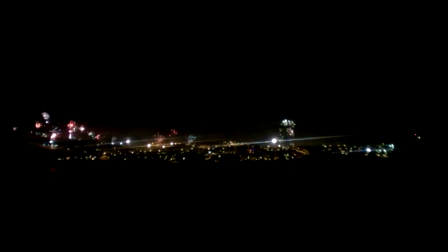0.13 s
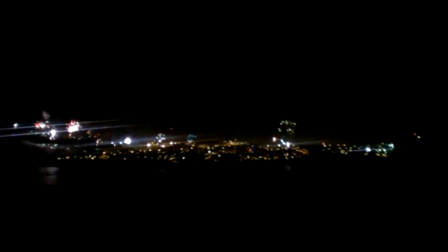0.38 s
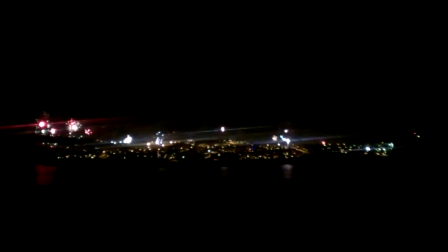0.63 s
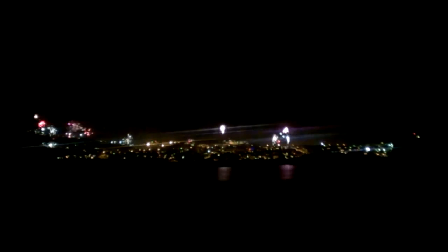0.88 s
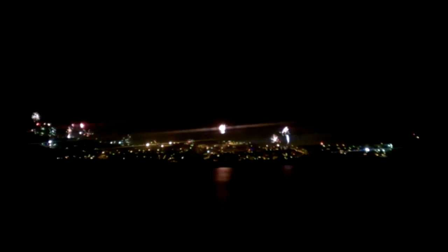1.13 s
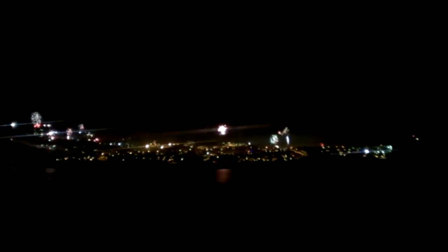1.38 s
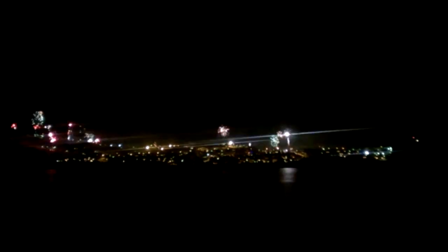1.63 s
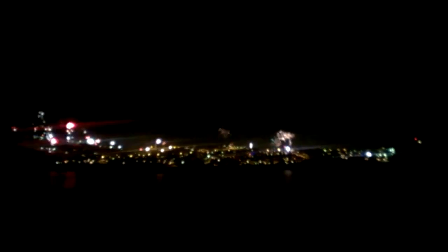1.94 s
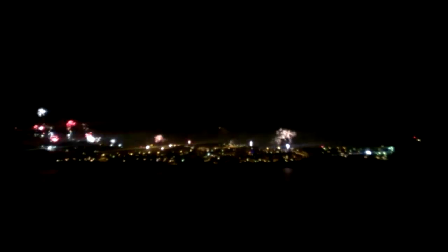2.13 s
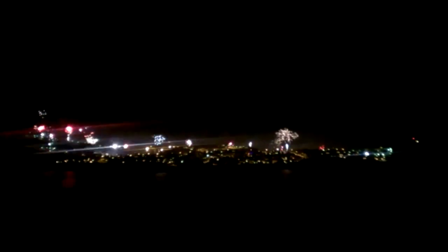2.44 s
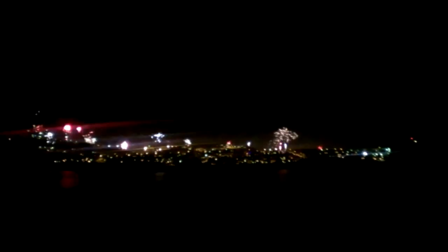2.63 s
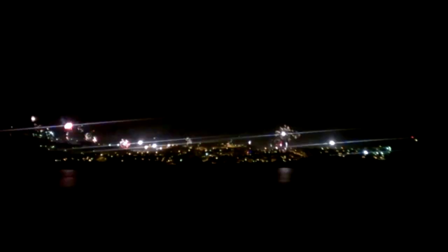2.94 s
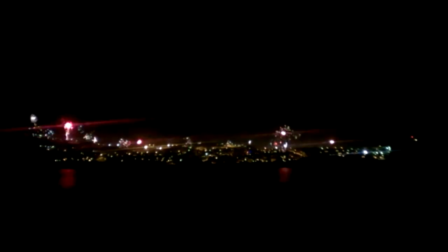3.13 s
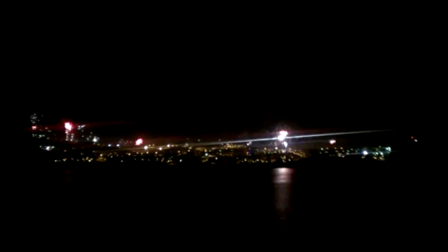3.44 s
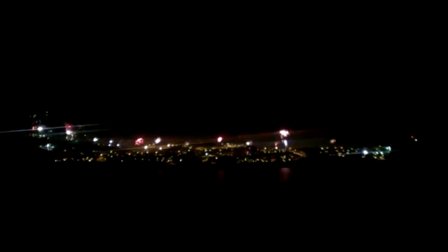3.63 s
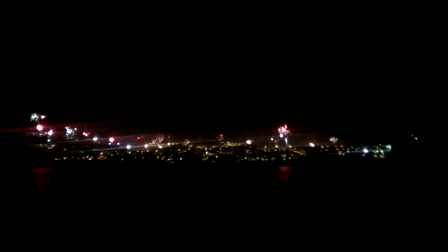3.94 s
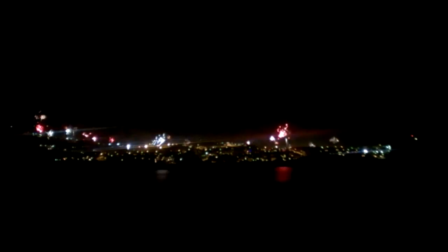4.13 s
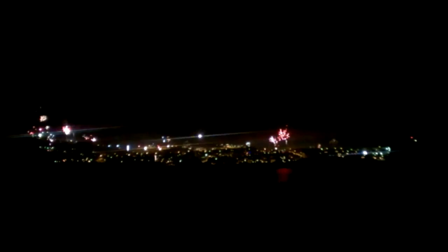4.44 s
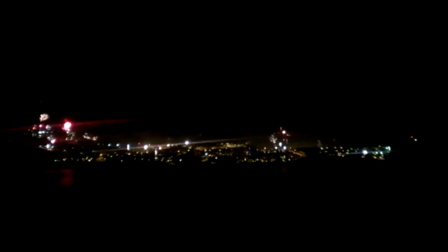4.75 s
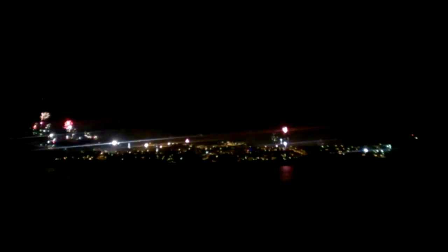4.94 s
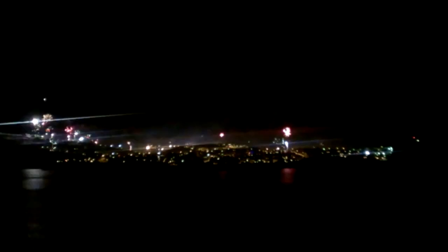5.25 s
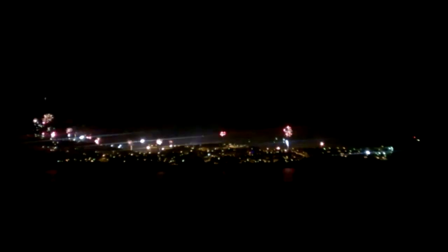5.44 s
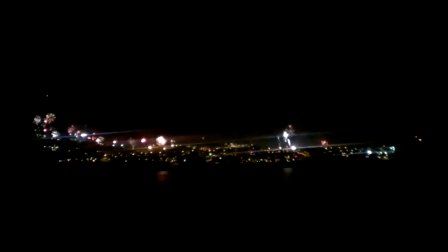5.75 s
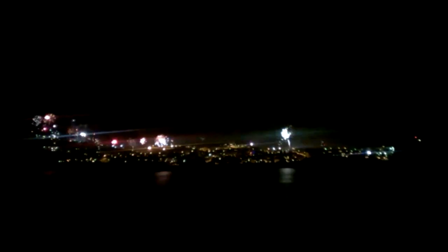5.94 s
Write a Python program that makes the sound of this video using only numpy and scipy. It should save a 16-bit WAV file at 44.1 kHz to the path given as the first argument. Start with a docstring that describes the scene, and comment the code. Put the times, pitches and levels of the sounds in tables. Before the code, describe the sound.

Dense distant barrage of fireworks: soft low-mid thumps overlapping irregularly, snappier bangs, brief crackling showers and a rolling echo over roofs.

```python
"""Dull thuds and sharp cracks of fireworks over a town across the water at night, heard at two small ports. Far
shells are sagging, rounded pulses with echoes; nearer ones are smeared pressure steps with ringing treble.
Filtered swarms of noise puffs make the merged rumble, the roll over the roofs and showers of crackling stars;
brief flickers of faint treble hiss come and go as well. Now and then close ticks, most of them louder on the
left, snap as short resonant bursts, over a very faint low layer of air."""
import sys
import numpy as np
from scipy import signal
from scipy.fft import rfft, irfft, next_fast_len
from scipy.io import wavfile

SR = 44100
rng = np.random.default_rng(int(sys.argv[2]) if len(sys.argv) > 2 else 0)


def store_wav(level_fs):
    """Save 16-bit WAV to argv[1]."""
    pcm = np.round(np.clip(np.atleast_2d(level_fs), -1, 1) * 32767)
    wavfile.write(sys.argv[1], SR, pcm.T.astype(np.int16))


N = 268128

# Nearer shells and stars, which also feed the roll over the roofs.
# Each row: start in [s], nominal peak in [dB], treble relative to that peak in [dB].
CRACKS = [(0.0529, -27, -4), (0.0597, -16, -33), (0.1006, -28, -10.5), (0.118, -21.5, -19),
          (0.217, -26.5, -16), (0.227, -27.5, -12), (0.299, -7.5, -16.5), (0.3797, -20.5, -32),
          (0.452, -29, -21), (0.4704, -33, -2.5), (0.5427, -35, 0.5), (0.6272, -32, -8),
          (0.662, -33.5, -4.5), (0.676, -38.5, -1), (1.18, -37.5, -28), (1.2154, -33, -40),
          (1.227, -22, -17), (1.263, -25, -11), (1.3138, -27.5, -9.5), (1.325, -14, -16),
          (1.3997, -27, -14.5), (1.412, -22, -13), (1.451, -12.5, -47), (1.462, -30, -20.5),
          (1.483, -27.5, -20), (1.5901, -10, -9), (1.6627, -19, -41), (1.8044, -22, -43),
          (1.868, -35, -9.5), (2.0915, -8, -11.5), (2.176, -31, -2.5), (2.1888, -39.5, 8.5),
          (2.4298, -33.5, -15), (2.4618, -33.5, -16), (2.499, -32.5, -16.5), (2.5453, -30.5, -17.5),
          (2.652, -19.5, -14), (2.671, -33.5, -18), (2.7127, -20, -14), (2.876, -28, -18.5),
          (2.9455, -21, -20), (2.962, -19, -17), (2.9822, -25, -11.5), (3.048, -23.5, -12),
          (3.107, -19, -16.5), (3.1524, -27, -40), (3.1673, -8, -53), (3.192, -18, -20.5),
          (3.271, -16.5, -21), (3.287, -22.5, -22), (3.35, -24, -21), (3.429, -30.5, -26),
          (3.469, -32, -20.5), (3.5052, -31, -15), (3.5599, -15.5, -50), (3.5878, -30, -29),
          (3.6476, -25.5, -14), (3.739, -40.5, 1.5), (4.0511, -37.5, 2), (4.0594, -36, 5.5),
          (4.1946, -23.5, -21), (4.2336, -13.5, -18.5), (4.238, -31, 3), (4.411, -39.5, -29),
          (4.496, -32.5, -14), (4.733, -29.5, -20), (4.902, -34.5, -8.5), (5.029, -20.5, -44.5),
          (5.796, -10, -10), (5.879, -30.5, -8), (5.905, -27.5, -16.5), (5.954, -27, -19.5),
          (5.969, -35.5, -11.5), (5.994, -31.5, -21), (6.0149, -29.5, -35), (6.032, -33, -15),
          (6.05, -29, -12)]


def from_db(db):
    """Turns decibels into an amplitude factor."""
    return 10 ** (np.asarray(db) / 20)


def rms_one(x):
    """Scales a sound to an rms of 1 over all its channels."""
    return x / np.sqrt(np.mean(x ** 2) + 1e-20)


def at_hz(points, hz):
    """Reads a curve along log frequency."""
    p = np.array(points, float)
    return np.interp(np.log(hz + 1), np.log(p[:, 0] + 1), p[:, 1])


def shaped(x, gain):
    """Applies a real or complex gain, a function of Hz, to the last axis."""
    size = next_fast_len(N)
    hz = np.arange(size // 2 + 1) * SR / size
    return irfft(rfft(x, size) * gain(hz), size)[..., :N]


def band(x, low_hz, high_hz, order=2):
    """Keeps the sound between two frequencies."""
    edges = [low_hz, min(high_hz, .45 * SR)]
    return signal.sosfilt(signal.butter(order, edges, "band", fs=SR, output="sos"), x)


def colour(x, spectrum):
    """Gives a sound a spectrum and an rms of 1."""
    return rms_one(shaped(x, lambda hz: from_db(at_hz(spectrum, hz))))


def in_time(rows):
    """Turns a level curve in seconds and dB into gain per sample."""
    s, db = np.transpose(rows)
    return from_db(np.interp(np.arange(N) / SR, s, db))


def spells(rows, rise_s, fade_db_per_s):
    """Each spell rises, holds its level and fades; overlapping spells add."""
    t = np.arange(N) / SR
    total = np.zeros(N)
    for s, length_s, db in rows:
        fade = from_db(db - fade_db_per_s * np.maximum(t - s - length_s, 0))
        total += fade * np.clip((t - s) / rise_s, 0, 1)
    return total


def swarm(per_s, spread_db, t60):
    """Random bangs of uneven size: dying noise puffs with faint echoes; mid and side share the envelope."""
    sizes = from_db(spread_db * np.minimum(rng.exponential(1, N), 4))
    hits = sizes * (rng.random(N) < per_s / SR)

    def die(seconds):
        return signal.lfilter([1], [1, -from_db(-60 / (seconds * SR))], hits + 1e-18)

    envelope = die(t60) + .09 * die(.25)
    return envelope * rng.standard_normal((2, N))


def blast(length_s, echo_share, t60, side_share):
    """One pressure step, then scattered echoes from houses and water that die away."""
    t = np.arange(round(length_s * SR)) / SR
    decay = from_db(-60 * t / t60) * np.minimum(t / 0.0004, 1)
    x = echo_share * rng.standard_normal((2, len(t))) * decay
    x[0, 0], x[1, 0] = 1, side_share
    return x


def add(out, sound, s, peak_db):
    """Lays a two-channel burst at its time, scaled by the peak of its first channel."""
    at = round(s * SR)
    gain = from_db(peak_db) / np.abs(sound[0]).max()
    out[:, at:at + sound.shape[1]] += (sound * gain)[:, :N - at]


def diffuse(mid, side):
    """Mid and side become left and right, as alike as the port spacing makes them."""
    # Left-right likeness of diffuse sound. Each row: frequency in [Hz], likeness from 0 to 1.
    likeness_points = [(60, 0.75), (240, 0.98), (600, 1), (950, 0.32), (1500, 0.97), (2800, 0.047),
                       (4200, 0.73), (7000, 0.35), (15000, 0.14)]

    def alike(hz):
        return np.clip(at_hz(likeness_points, hz), 0, 1)

    shared = shaped(mid, lambda hz: np.sqrt(1 + alike(hz)))
    opposed = shaped(side, lambda hz: np.sqrt(1 - alike(hz)))
    return shared + [[1], [-1]] * opposed


def air():
    """Light wind: low noise under one slow envelope, with separate noise in each port."""
    return from_db(-72) * rms_one(band(swarm(40, spread_db=0.5, t60=.3), 22, 65))


def rumble():
    """Countless far shells merge into a low mass whose level wanders."""
    # Level of the merged shells. Each row: time in [s], rms level in [dB].
    mass_levels = [(0.0, -22.5), (0.13, -35.5), (0.63, -31), (0.9, -32.5), (1.01, -25.5), (1.15, -37),
                   (1.57, -29.5), (1.91, -30.5), (2.18, -30), (2.49, -31), (2.71, -31.5), (3.22, -27.5),
                   (3.96, -35.5), (4.32, -28), (4.59, -29.5), (5.64, -30), (5.72, -28.5), (6.08, -32.5)]
    # Colour of the mass. Each row: frequency in [Hz], relative spectral level in [dB per Hz].
    mass_spectrum = [(15, -71), (25, -52.5), (49, -45.5), (80, -25), (143, -7), (220, 4.5), (468, 4.5),
                     (600, -1), (1080, -14), (1290, -25), (1550, -32.5), (1950, -72), (3300, -120)]
    return in_time(mass_levels) * colour(swarm(130, spread_db=4, t60=0.1), mass_spectrum)


def echo_gain(t60, floor_db):
    """Every crack leaves echo power that dies away slowly above a steady floor; returns gain in time."""
    below_crack_db = -35.5
    s, peak_db, _ = np.transpose(CRACKS)
    power = np.zeros(N)
    np.add.at(power, (s * SR).astype(int), from_db(peak_db + below_crack_db) ** 2)
    tail = signal.lfilter([1], [1, -from_db(-60 / (t60 * SR)) ** 2], power + 1e-18)
    return np.sqrt(tail + from_db(floor_db) ** 2)


def roof_roll():
    """Echoes of the cracks roll over the roofs, and their treble dies sooner."""
    # Colour of the roll. Each row: frequency in [Hz], relative spectral level in [dB per Hz].
    roof_spectrum = [(600, -38), (950, -10), (1500, -13.5), (2300, -13), (2750, -32), (4000, -45),
                     (6000, -64)]
    split_hz = 1500
    echoes = colour(swarm(80, spread_db=4.5, t60=0.059), roof_spectrum)
    dull = shaped(echoes, lambda hz: 1 / (1 + (hz / split_hz) ** 10))
    bright = echoes - dull
    return echo_gain(t60=2.9, floor_db=-68.5) * dull + echo_gain(t60=1.1, floor_db=-74) * bright


def hiss_flickers():
    """Brief flickers of faint treble hiss made from a dense swarm of noise puffs."""
    # Spells of hiss. Each row: start in [s], length in [s], level in [dB].
    hiss_spells = [(.02, 0.016, -62), (.35, 0.066, -63), (.51, 0.086, -64.5), (.71, 0.11, -65.5),
                   (.97, .04, -67), (1.14, 0.16, -67.5), (2.165, 0.14, -67.5), (2.44, 0.037, -66.5),
                   (2.67, 0.038, -65), (3.01, 0.033, -64.5), (3.74, .11, -65), (3.87, 0.12, -61.5),
                   (3.99, 0.088, -59.5), (4.46, 0.057, -64.5), (4.68, 0.011, -63.5), (4.87, 0.025, -64),
                   (5.23, 0.043, -65), (5.55, 0.058, -68), (5.85, 0.11, -61.5)]
    # Colour of the hiss. Each row: frequency in [Hz], relative spectral level in [dB per Hz].
    hiss_spectrum = [(1470, -31), (2500, 11), (4800, 3), (5270, -5), (5780, 6), (13400, 0.5), (16000, -9)]
    hiss = colour(swarm(300, spread_db=4.5, t60=0.051), hiss_spectrum)
    return spells(hiss_spells, rise_s=0.009, fade_db_per_s=495) * hiss


def crackle():
    """Showers of crackling stars: very short puffs, some broad, some dull and some bright."""
    # Showers of stars. Each row: start in [s], length in [s], level in [dB].
    star_showers = [(0.0, 0.11, -42), (.305, 0.33, -46), (.625, 0.06, -42.5), (.735, 0.09, -52.5),
                    (1.14, 0.26, -50), (1.31, 0.023, -35), (1.455, 0.018, -36), (1.595, 0.12, -67),
                    (1.67, 0.021, -55), (1.8, 0.16, -63), (2.1, 0.088, -49), (2.43, 0.11, -62.5),
                    (2.64, 0.064, -46), (2.95, 0.12, -58), (3.11, 0.22, -54), (3.33, 0.195, -49),
                    (3.565, 0.037, -40.5), (4.24, 0.045, -44.5), (4.47, 0.11, -46), (4.62, 0.12, -47.5),
                    (4.79, 0.024, -49.5), (5.035, 0.035, -57), (5.805, 0.24, -52)]
    # Colour of the stars. Each row: frequency in [Hz], relative spectral level in [dB per Hz].
    star_spectrum = [(900, -35), (1400, 15), (2000, 10.5), (2350, 4), (2750, -1.5), (3600, 1), (4600, -5),
                     (5400, -18), (7000, -57.5)]
    stars = swarm(120, spread_db=5.5, t60=0.007)
    for low_hz, high_hz in [(900, 2700), (2700, 7000)]:
        stars = stars + 1.6 * band(swarm(110, spread_db=4, t60=.012), low_hz, high_hz)
    return spells(star_showers, rise_s=0.0038, fade_db_per_s=501.5) * colour(stars, star_spectrum)


def ticks():
    """Bright short snaps close to the ports, each ringing in its own places, with a dry noisy tail."""
    # Close ticks. Each row: start in [s], nominal peak in [dB], left-right balance in [dB], top in [Hz].
    tick_rows = [(2.178, -20.5, -3, 7400), (3.739, -15.5, 5, 10800), (3.751, -27, 8, 8000),
                 (3.761, -33, -3, 9100), (3.794, -37, 0, 8000), (3.878, -17, 7, 12900),
                 (3.906, -20, 12, 15000), (3.934, -17, 8, 16000), (3.9432, -22, -1, 15100),
                 (3.9541, -5.5, 5, 15500), (3.965, -20, 5, 12000), (3.976, -20, 2, 14900),
                 (4.3514, -26, 40, 8450)]
    out = np.zeros((2, N))
    for s, peak_db, pan_db, top_hz in tick_rows:
        snap = band(blast(0.033, 0.25, t60=0.026, side_share=0.89), 1800, top_hz, order=4)
        rings = sum(band(snap, hz, 1.25 * hz, order=1) for hz in rng.uniform(2100, top_hz, 3))
        x = 0.4 * snap + rings
        ports = (x[0] + [[.4], [-.4]] * x[1]) * from_db([[0], [-pan_db]])
        add(out, ports, s, peak_db - 8.5)
    return out


def thuds():
    """Air leaves a few rounded cycles that sag in pitch; the town sends back an echo."""
    # Far shells, treble lost in the air.
    # Each row: time of the swell's peak in [s], nominal peak in [dB], pitch there in [Hz], nominal length in [ms].
    far_shells = [(0.1021, -14.5, 441, 6.6), (0.1232, -11, 507, 6.3), (0.1431, -16.5, 342.4, 4.6),
                  (0.209, -17.5, 510, 14), (0.251, -6.5, 523, 3.7), (0.2717, -16.5, 646, 11),
                  (0.3009, 3.5, 429, 3), (0.317, -17.5, 604, 11), (0.3382, -16, 510, 10),
                  (0.3687, -9.5, 567, 4.2), (0.5026, -5, 357.5, 5.1), (0.515, -9.5, 462, 6.3),
                  (0.6189, -14.5, 482, 7), (0.7814, -17.5, 549, 9.5), (0.823, -10.5, 301.4, 6.5),
                  (0.8517, -7.5, 497, 3.9), (0.8713, -9.5, 414.5, 10.9), (0.8895, -17, 518.4, 24.8),
                  (0.9493, -11.5, 496, 3.5), (1.032, -8.5, 475, 3), (1.0543, -8.5, 723, 5),
                  (1.113, 0, 462, 3.8), (1.192, -4, 433, 13), (1.208, -8, 559, 3.9),
                  (1.3172, -15.5, 600, 11), (1.3423, -9, 371, 6.4), (1.4048, -8, 514, 4.4),
                  (1.432, -15.5, 453, 9.3), (1.4555, -7, 444, 5.3), (1.499, -5.5, 568, 5.4),
                  (1.5095, -7.5, 541, 3.7), (1.5295, -0.5, 407.5, 4), (1.566, 5, 517, 3.3),
                  (1.5914, 2, 365, 3.6), (1.599, 2.5, 577, 4.3), (1.6484, -16, 484, 9.4),
                  (1.6652, -15, 581, 5.6), (1.703, -16, 372, 4.1), (1.7238, -6, 402, 8.3),
                  (1.7297, -5.5, 425, 3.9), (1.7671, -13, 420, 6), (1.8046, 2.5, 464, 2.6),
                  (1.8499, -16.5, 354.4, 5.9), (1.8849, -12, 545, 5.5), (1.893, -6.5, 570, 4),
                  (1.9596, -18, 452, 4), (1.9747, -15, 283, 7.5), (1.986, -11, 435, 6.5),
                  (2.1003, -5, 319.6, 5.8), (2.107, -4, 369, 5.2), (2.1629, -14, 487, 4.7),
                  (2.247, -8, 270.5, 6.4), (2.3167, -5.5, 570, 5.8), (2.3227, -6.5, 678, 3.1),
                  (2.3642, -14, 419, 7.2), (2.3896, -12.5, 445, 5.6), (2.3978, -4.5, 564, 5.0),
                  (2.5044, -8.5, 604, 5), (2.5607, -7, 398, 4.3), (2.5686, -3.5, 364, 3.6),
                  (2.5789, -7, 447, 11), (2.6682, -2, 606, 4.6), (2.6846, -16.5, 492, 8.4),
                  (2.736, 0, 547, 3.6), (2.7412, -3, 727, 1.9), (2.758, -9, 531, 8),
                  (2.7754, -10, 556, 7.2), (2.7914, -16.5, 523, 5.9), (2.9016, -14.5, 574, 10),
                  (2.9679, -10.5, 569, 7.9), (3.0366, -20.5, 431, 2.1), (3.0719, -16, 329, 3.7),
                  (3.115, -9.5, 388, 16), (3.1592, -4, 540, 2.7), (3.1684, -2.5, 533, 1.6),
                  (3.2465, -15.5, 612, 4), (3.2894, -0.5, 397, 4.1), (3.3115, -11.5, 526, 7.8),
                  (3.3585, -11.5, 429, 14), (3.514, -14.5, 515, 4.9), (3.5623, -2, 620, 3.6),
                  (3.6441, 1.5, 383.5, 2.8), (3.6532, -19, 549, 12), (3.6743, -10, 472, 9.2),
                  (3.7432, -12.5, 465, 7.1), (3.7925, -10, 473, 6.1), (3.8692, -13.5, 386, 4),
                  (3.887, -14, 508, 5), (4.0964, -11.5, 261, 5.7), (4.1985, -1, 625, 2.4),
                  (4.2315, 3.5, 436, 1.3), (4.237, -4, 454, 10), (4.2475, 3, 452, 2.1),
                  (4.2898, -8.5, 423, 3.4), (4.3275, -15.5, 604, 4.6), (4.335, -5.5, 500.5, 5.5),
                  (4.3872, -13, 540, 6.8), (4.4143, -3, 559, 4.7), (4.55, -7.5, 663, 4.4),
                  (4.5706, -2, 356, 5.2), (4.6256, -3, 389, 2.3), (4.6574, -17, 307, 5),
                  (4.7363, -14.5, 485, 4.5), (4.776, -9, 546, 3.4), (4.813, -11, 395, 8),
                  (4.842, -9, 463, 11), (5.013, -15.5, 348.5, 18), (5.0308, 0.5, 527, 2.6),
                  (5.0969, -9, 457, 1.8), (5.109, -13, 346, 5), (5.1967, -3.5, 353, 3.1),
                  (5.212, -13, 424, 7.7), (5.3189, -14, 429, 11), (5.3276, -19.5, 499, 4.6),
                  (5.368, -11.5, 388, 7.3), (5.431, -11.5, 257, 12), (5.476, -2.5, 343, 13),
                  (5.6032, -9, 390, 4.1), (5.6777, -4, 370, 5.2), (5.7003, -9.5, 459, 5.1),
                  (5.7443, -10.5, 615, 4.4), (5.7548, -0.5, 395, 5.1), (5.7836, 1, 366, 3.7),
                  (5.802, 0, 403, 4.7), (5.808, -3.5, 433, 2.6), (5.8122, -9, 517, 3.1),
                  (5.8994, -6.5, 725, 4), (5.9744, -12, 414, 3.7), (5.993, -7, 317.4, 4),
                  (6.076, -13, 622, 6.5)]
    # long reports are several shells run together and throb
    ragged_from_ms, ragged_per_ms, ragged_hz = 4.5, 0.077, 99
    out, t = np.zeros(N), np.arange(round(.06 * SR)) / SR
    chance = rng.random((len(far_shells), 2))
    for (s, peak_db, hz, length_ms), (phase, sag) in zip(far_shells, chance):
        u = t / (max(length_ms - 1.6, 1.2) / 3400)  # the swell peaks at u = 2
        peak_at = np.argmin(np.abs(u - 2))
        turns = hz * (t - t[1] * peak_at) * (1 - 0.043 * sag * (u - 2))
        pulse = (u / 2) ** 2 * np.exp(2 - u) * np.sin(2 * np.pi * (turns + phase))
        # a steep front adds an overtone, weaker in long reports
        overtone = (u / 2) ** 2 * np.exp(2 - 0.99 * u) * np.sin(2 * np.pi * (1.788 * turns + sag))
        pulse += 0.28 * min(6.4 / length_ms, 1) * overtone
        throb_depth = np.clip(ragged_per_ms * (length_ms - ragged_from_ms), 0, 1)
        throb = np.sin(2 * np.pi * (ragged_hz * (1 + sag) * t + phase))
        pulse *= 1 + throb_depth * throb
        at = round(s * SR) - peak_at
        out[max(at, 0):at + len(t)] += (from_db(peak_db - 6.5) * pulse)[max(-at, 0):N - at]
    town = blast(0.18, 0.026, t60=0.12, side_share=0.81)
    echo = signal.fftconvolve(out[None], town, axes=1)
    return band(echo[:, :N], 150, 1700, order=4)


def crack_front(peak_db):
    """Uneven air smears a pressure step into noise around a sharp core; weak, far cracks smear most."""
    smear = np.hanning(round(.006 * SR))
    smear = smear ** np.clip(0.045 * (peak_db + 47), .5, 4)
    middle = len(smear) // 2
    front = rng.standard_normal(len(smear)) * smear
    front[:middle] *= smear[:middle]  # it rises faster than it falls
    front[middle] = 7.1 * from_db(.6 * (peak_db + 25))  # strong, near cracks have a cleaner core
    return front


def port_ring(x, peak_db):
    """A damped resonance of the port; weak cracks ring less."""
    ring_hz, ring_t60_s = 4040, .022
    w, r = 2 * np.pi * ring_hz / SR, from_db(-60 / (ring_t60_s * SR))
    level_db = -21.5 + 0.88 * (peak_db + 6.5)
    return from_db(level_db) * signal.lfilter([0, np.sin(w)], [1, -2 * r * np.cos(w), r * r], x)


def cracks():
    """A broad snap, treble that sets the port ringing, and a low push as the biggest overload the ports."""
    out = np.zeros((2, N))
    overload_push = np.hanning(round(.006 * SR)) * np.array([[1], [.1]])
    for s, peak_db, treble_db in CRACKS:
        echo_db = -23 - 0.065 * (peak_db + 15.5)  # weaker, farther cracks are more echo
        x = blast(0.2, from_db(echo_db), t60=0.025, side_share=0.039)
        length = x.shape[1]
        # walls answer unevenly, so the late echoes come in lumps
        lumps = np.repeat(rng.gamma(2, .5, 50), length // 50 + 1)[:length]
        x = x + from_db(-39) * lumps * blast(0.2, 0.99, t60=0.17, side_share=0)
        front = crack_front(peak_db)
        x = signal.fftconvolve(x, front[None], axes=1)
        x = band(x, 400, 5320 + 32.5 * peak_db, order=6)  # air takes the top, least from strong cracks
        add(out, band(x, 700, 2350, order=5), s, peak_db + 0.19)
        treble = band(x, 2900, 6000, order=3)
        front_only = treble * (np.arange(x.shape[1]) < len(front))
        treble = treble + port_ring(front_only, peak_db)
        add(out, treble, s, peak_db + treble_db + 0.5)
        # steep in level: only the loudest, bright cracks overload
        add(out, overload_push, s, 5.65 * peak_db + treble_db + 28.5)
    return out


def scene():
    """The town's sound reaches both ports as diffuse sound, with brief flickers of faint treble hiss spread the
    same way; the ticks are close."""
    mid_side = rumble() + roof_roll() + crackle() + hiss_flickers() + thuds() + cracks()
    return diffuse(*mid_side) + ticks() + air()


def record(dry):
    """The ports differ in level and phase; peaks are rounded, the top is cut."""
    # Phase between the ports. Each row: frequency in [Hz], lead of the left port in [radians].
    lead_points = [(0, 0), (300, 0.1), (600, 0.2), (780, 0.6), (1040, 1.3), (1170, 4.9), (1460, 4.9),
                   (1980, 6.5), (2600, 7.7), (3050, 11.7), (3400, 11.7), (4100, 12.65), (16000, 12.6)]
    # Level between the ports. Each row: frequency in [Hz], left-right balance in [dB].
    balance_points = [(60, 2.5), (120, 1.5), (240, 0.5), (430, 1.5), (950, -1), (2100, -1.5), (3300, 9),
                      (5500, 10.5), (7520, 4.0), (15000, 0.5)]
    half = np.array([[.5], [-.5]])  # each port takes half the difference

    def port_gain(hz):
        level = from_db(half * at_hz(balance_points, hz))
        return level * np.exp(1j * half * at_hz(lead_points, hz))

    ports = shaped(dry, port_gain)
    rounded = ports / (1 + (ports / .9) ** 6) ** (1 / 6)
    # 70 dB down from 16400 Hz upward
    return signal.sosfilt(signal.cheby2(12, 70, 16400, fs=SR, output="sos"), rounded)


dry = scene()
out = record(dry)
store_wav(out)
```